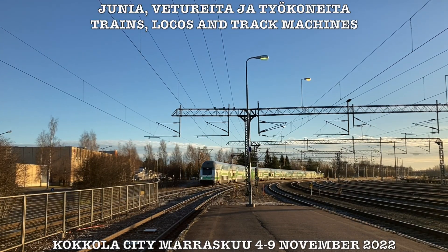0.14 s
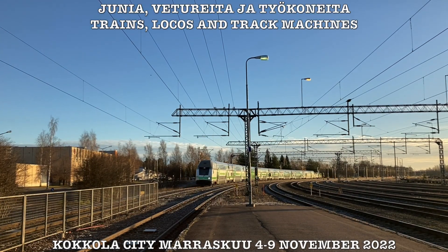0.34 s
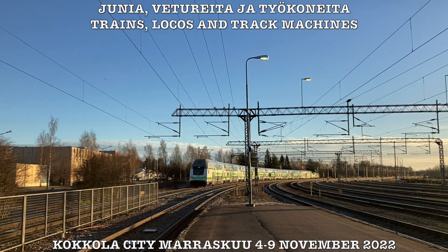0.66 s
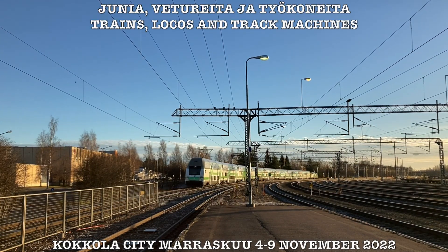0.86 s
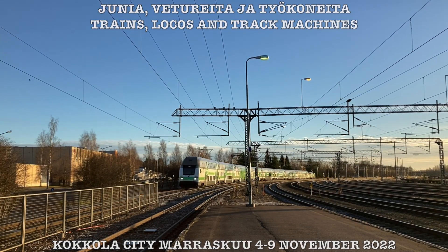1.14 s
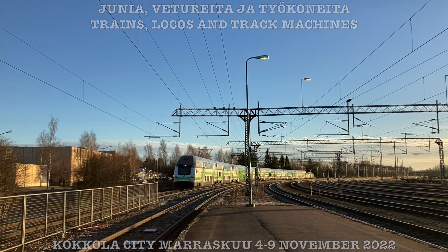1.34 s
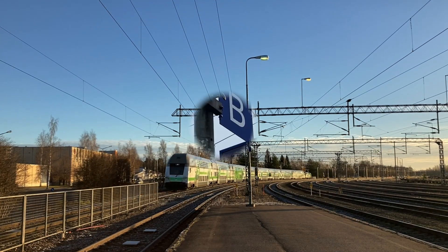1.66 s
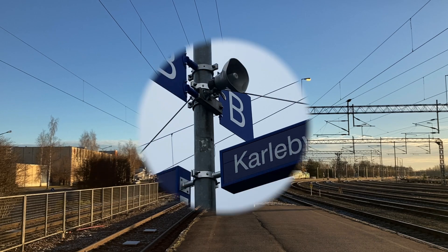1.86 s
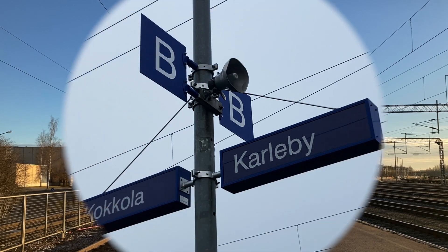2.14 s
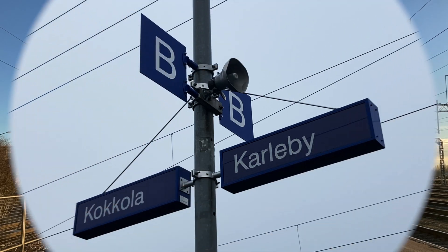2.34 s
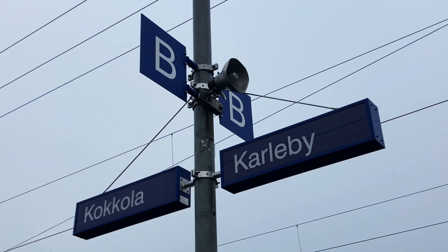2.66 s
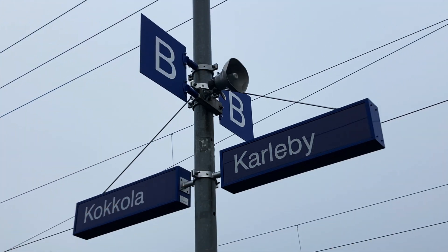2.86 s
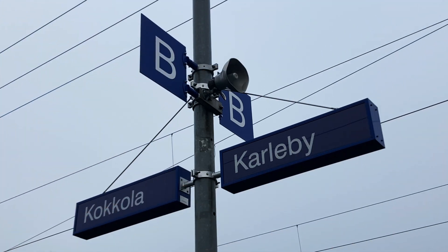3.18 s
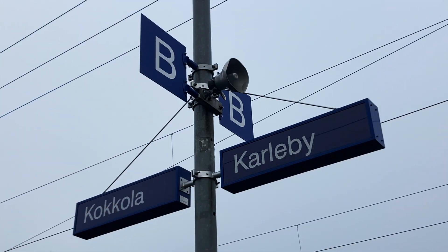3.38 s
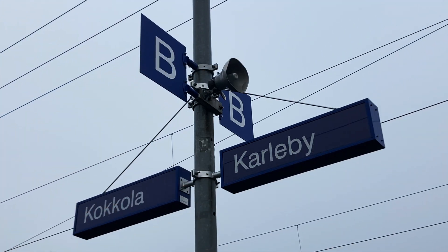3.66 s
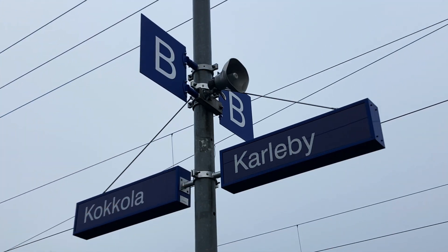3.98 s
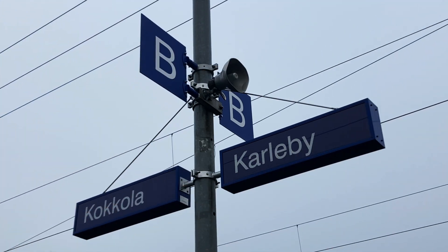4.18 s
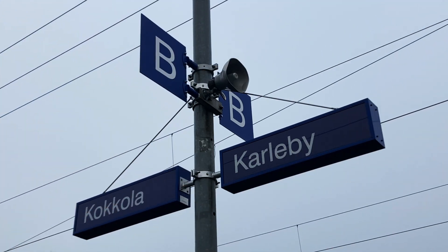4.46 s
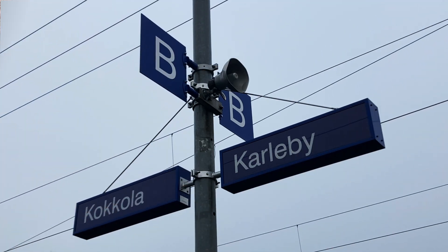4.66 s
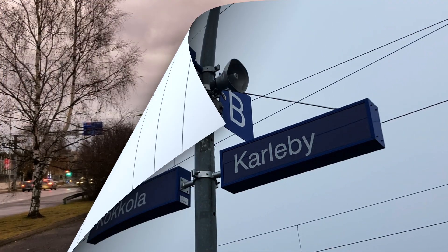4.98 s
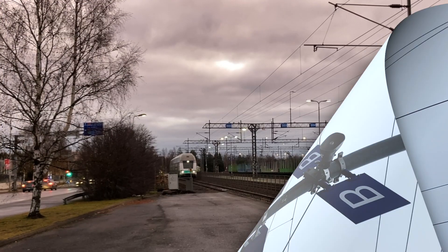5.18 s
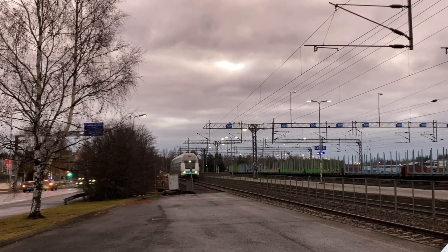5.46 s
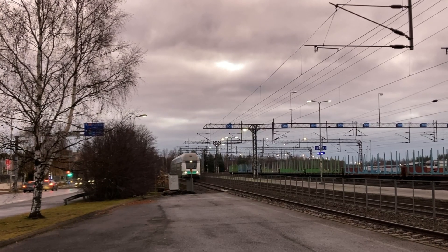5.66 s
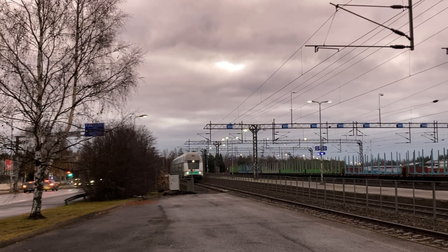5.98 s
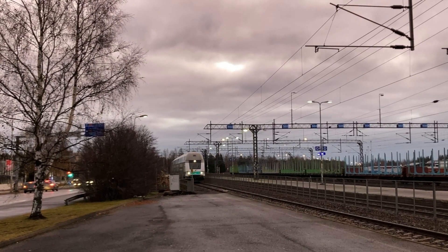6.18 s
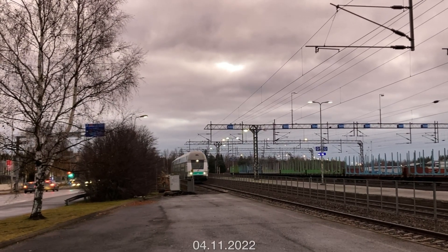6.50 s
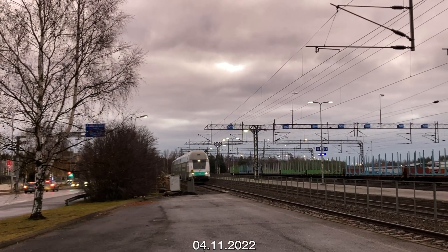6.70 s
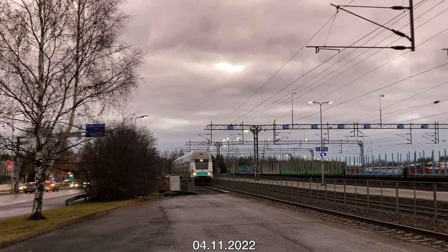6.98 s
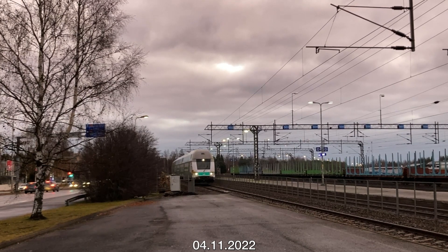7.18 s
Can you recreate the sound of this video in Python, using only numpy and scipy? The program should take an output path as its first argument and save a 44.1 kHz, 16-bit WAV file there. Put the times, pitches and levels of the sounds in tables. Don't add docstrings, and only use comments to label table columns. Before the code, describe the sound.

An open-air rail yard, heard in stereo. From 0 s a low, steady electric transformer hum sits over distant yard rumble and a faint hiss of still air, while wheels roll unevenly on steel. Single joint knocks come at about 0.7 and 1.5 s, then a denser, ringing clatter from 1.8 to 3.7 s, strongest around 2.3 to 2.7 s with a hard clank. Low wind gusts buffet the microphone between about 1.8 and 5 s. From 3.5 s scraping flange hiss and airy rush build, the hum sinks in pitch, and sharp knocks and brief rough squeals crowd 4.4 to 5.1 s as the train is abreast. It fades fast around 5 s. Until 7.3 s, a softer roadside remains: far traffic wash, thin tyre hiss, and a deep diesel throb swelling irregularly, slightly nearer tyres and a quicker pulse at the end.

```python
import sys
import numpy as np
from scipy import signal
from scipy.fft import rfft, irfft
from scipy.io import wavfile
from scipy.ndimage import uniform_filter1d, map_coordinates

SR = 44100
rng = np.random.default_rng(int(sys.argv[2]) if len(sys.argv) > 2 else 0)


def unload_audio(sound):
    columns = np.transpose(np.atleast_2d(sound))
    steps = np.round(np.clip(columns, -1, 1) * 32767)
    wavfile.write(sys.argv[1], SR, steps.astype(np.int16))


def gain_from_decibels(decibels):
    exponent = np.asarray(decibels, float) / 20
    return 10 ** exponent


N = 323694
T = np.arange(N) / SR
HZ = np.maximum(np.arange(N // 2 + 1) * SR / N, .01)
LEFT_RIGHT = np.array([[.5], [-.5]])

SPEED_M_S, PASSES_S, TRACK_M = 21.5, 4.684, 6.2
FADE_FROM_S, FADE_DB_PER_S = 4.956, 33

# t/s, level/dB
HUM_LEVEL = [(0, -34), (.1, -28.5), (.3, -28.5), (1.04, -31), (1.4, -29.5), (2.0, -28.5), (2.72, -25.5),
             (3.34, -26), (3.46, -28), (4.11, -28), (4.33, -38.5), (4.55, -32.5), (4.73, -33), (4.87, -43),
             (4.96, -38), (5.15, -47), (5.25, -42)]
# t/s, f/Hz
HUM_PITCH = [(0, 129.8), (2.8, 129.7), (3.5, 128.8), (4.1, 127.4), (4.5, 125.4), (4.8, 121.8), (5.1, 116.8),
             (5.3, 116.2)]

# f/Hz, width/Hz, level/dB
RAIL_MODES = [(426, 55, -1), (471, 30, -3), (588, 75, -1), (655, 45, -6), (780, 80, -8), (871, 45, -8),
              (940, 80, -2), (1018, 55, -4), (1180, 65, -2), (1350, 100, -1), (1455, 40, -10)]
WHEEL_MODES = [(1830, 150, -4), (1950, 150, -3), (2340, 130, 1), (2620, 150, -5), (2800, 160, -2),
               (3370, 240, -7), (3740, 240, -6), (4300, 300, -8), (4800, 500, -13), (5400, 600, -15),
               (6200, 1200, -20)]
# t/s, length/s, low rail modes level/dB, high rail modes level/dB
BOGIES = [
    (0, 0.52, -51, -44.5),
    (.5, 0.8, -47, -42.5),
    (1.45, 0.65, -48, -43.5),
    (1.95, 0.98, -41, -35.5),
    (2.85, 0.35, -47, -45),
    (3.15, 0.54, -43, -39.5),
    (3.65, 0.56, -47, -45),
    (4.0, 0.49, -49, -41),
    (4.45, 0.4, -61, -46),
]
# t/s, low modes peak/dB, high modes peak/dB
JOINTS = [(0.693, -33, -26), (1.2, -41, -34), (1.548, -35, -25), (1.614, -42, -25.5), (1.743, -43, -39),
          (1.818, -29, -23), (1.97, -30, -25), (2.019, -27, -24.5), (2.146, -35, -28), (2.259, -35, -34),
          (2.343, -21.5, -30), (2.388, -30, -21), (2.435, -37, -26), (2.526, -31, -32), (2.644, -26, -22),
          (2.702, -33, -38), (2.771, -27.5, -24), (2.849, -25.5, -40), (2.964, -29, -20), (3.027, -31, -27),
          (3.101, -32, -35), (3.356, -32, -39), (3.428, -39, -40), (3.507, -29, -37), (3.555, -39, -21),
          (3.687, -30.5, -23.5), (3.978, -33, -35), (4.099, -37, -27), (4.203, -36, -39), (4.772, -50, -26)]
# t/s, peak/dB, f/Hz, decay/ms
BLOWS = [(2.344, -18.5, 550, 3), (2.355, -24, 900, 4), (2.373, -26, 500, 3), (2.436, -25, 620, 3),
         (2.6415, -11.5, 950, 3), (2.645, -21, 600, 5), (4.636, -17, 520, 3.5), (4.643, -17, 930, 7),
         (4.662, -25, 600, 3), (4.7715, -19.5, 450, 4), (4.781, -27, 400, 3), (4.83, -25, 700, 2.5)]
RINGS = [(1.19, -31, 411, 30), (1.8, -34, 780, 25), (1.98, -32.5, 788, 35), (2.01, -29.5, 600, 28),
         (2.0, -32, 450, 45), (2.18, -32.5, 792, 30), (2.34, -26, 593, 18), (2.372, -30, 585, 30),
         (2.343, -24.5, 414.5, 38), (2.35, -25, 955, 20), (2.405, -27, 950, 25), (2.39, -28, 1350, 31),
         (2.48, -29, 583, 25), (2.52, -29.5, 427, 26), (2.52, -33, 790, 18), (2.545, -32, 1330, 25),
         (2.644, -38, 607, 12), (2.665, -29, 946, 22), (2.70, -33, 440, 21), (2.77, -27.5, 596, 23),
         (3.03, -35, 950, 30), (3.255, -28, 949, 46), (3.31, -34, 590, 35), (3.33, -32, 778, 30),
         (3.35, -27.5, 394, 12), (3.465, -31, 943, 30), (3.505, -29.5, 423, 26), (3.52, -33, 592, 21),
         (3.57, -33, 800, 23), (3.66, -34.5, 418, 25), (3.87, -29.5, 937, 33), (4.17, -36, 470, 27),
         (4.32, -35, 398, 25), (4.5, -35, 800, 22)]
ROLL_DB, ROLL_LOUDEST_S, ROLL_SAG_DB = (-51, -42), 3.27, 2.5
SHADED_HZ, SHADED_FROM_S, SHADED_DB_PER_S = 1000, 3.31, 15

# f/Hz, density/dB per Hz
BODY_COLOUR = [(30, -12), (60, 2.5), (200, -5.5), (400, -8), (800, -15.5), (1200, -29), (1700, -14.5),
               (3000, -21.5), (7000, -54)]
FLANGE_DB, BODIES_DB = -38.5, -36.
# t/s, lead/ms
FLANGE_LEAD = [(3.6, 0.18), (4.0, .28), (4.4, 0.47), (4.7, 0.5), (4.95, 0.44), (5.25, 0.36)]
# t/s, length/s, f/Hz, level/dB
SQUEALS = [(3.22, .08, 3270, -65), (4.25, 0.38, 4600, -55), (4.36, .12, 3520, -71), (4.42, .1, 2800, -57),
           (4.5, 0.09, 2620, -43), (4.64, 0.1, 3580, -42), (4.73, 0.11, 4010, -56),
           (4.78, 0.065, 4900, -49), (4.85, 0.11, 5250, -48), (4.86, .08, 4850, -63),
           (4.76, 0.25, 2400, -46), (4.79, 0.21, 1740, -47), (4.45, 0.34, 4120, -49.5),
           (5.0, 0.21, 5150, -61), (5.07, 0.11, 3300, -49), (5.06, 0.15, 3380, -49), (5.5, .35, 2100, -63),
           (3.1, 0.3, 1900, -55), (4.98, 0.23, 5190, -59), (4.55, .2, 4250, -52), (4.3, 0.26, 2250, -54),
           (4.2, 0.33, 2650, -55), (4.84, 0.17, 2150, -47), (4.98, 0.27, 1900, -51),
           (4.92, 0.32, 2520, -53), (4.2, .1, 2600, -53), (5.5, .22, 4020, -58), (4.6, 0.11, 1760, -48),
           (4.6, 0.33, 2600, -50), (3.95, 0.22, 1900, -52)]

# f/Hz, density/dB per Hz, left minus right/dB, left lead/rad, likeness 0-1
YARD = [(44.5, -5, -4.5, 0, 0.7), (91, -4, -3.5, -0.5, 1), (201, -9, -2.5, -0.1, 0.98),
        (355, -14.5, 0, 0.5, 0.96), (548, -21, 2.5, -0.7, 0.16), (860, -19.5, 2, 2.5, 0.13),
        (1080, -16.5, 2, 3, 0.52), (1570, -23, 1, 2, 0.77), (2090, -24.5, 0, -1.5, 0.52),
        (2610, -29, 0, 1.32, 1), (3450, -38.5, -1, 1.26, 1), (4370, -41, -3, 0.5, 0.8),
        (5930, -44.5, -1, 3, 0.7), (7200, -68, -2, -3, 0.3)]
ROAD = [(45, -12, -7, .3, 0.85), (94, -4.5, -3, 0.32, 0.87), (216, -11.5, -2, 0.98, 1),
        (321, -16, -0.5, 1.38, 0.65), (500, -17.5, 0.8, 1.8, 1), (760, -19, 2, 2.75, 0.46),
        (1080, -20, 4, 2.28, 0.63), (1430, -24.5, -1, 1.8, 0.64), (2020, -23, -2, 2.26, 0.46),
        (2710, -29.5, -2.5, 3.36, 0.33), (3590, -35, -1.5, 3.5, 0.25), (4940, -37.5, -0.5, 12.6, 0.24),
        (4900, -38.5, -5, 6.5, 0.66), (6200, -51, -2.5, 9.1, 0.81)]
# t/s, level/dB
YARD_LEVEL = [(0, -35), (1.5, -33.5), (2.499, -33.5), (3.3, -35), (3.8, -35.5), (4.3, -38.5), (4.9, -43),
              (5.4, -77)]
ROAD_LEVEL = [(4.7, -63), (4.9, -38.5), (5.2, -34), (5.6, -33.5), (6.2, -33.5), (6.7, -32.5), (7.1, -31.5),
              (7.34, -31)]
TYRE_LEVEL = [(5.0, -75), (5.6, -62), (6.4, -55), (6.8, -47), (7.1, -45), (7.34, -47)]
TYRE_TILT_DB = 6.

# f/Hz, density/dB per Hz
FLOOR_COLOUR = [(6000, -18), (7000, 1), (7430, 13), (8000, 6), (8800, -25), (10200, -25), (10800, 11),
                (11400, -8), (12500, 1), (13200, -25), (14200, -20), (15000, 3)]
RUSH_COLOUR = [(6500, -1), (8100, 2.5), (9000, -10), (9900, -8), (10800, -2), (12400, -4), (13200, -15),
               (14200, -15), (15300, -8)]
TYRE_HISS_COLOUR = [(6300, -0.5), (8000, -2), (8900, -13), (9900, -2), (11500, -3), (12600, -2.5),
                    (13300, -23), (15700, -33)]
FAR_HISS_COLOUR = [(14300, -5), (15000, 1), (15500, 1), (15800, -11)]
# t/s, level/dB
FLOOR_LEVEL = [(0, -68), (2, -64.5), (4.9, -68), (5.3, -96)]
RUSH_LEVEL = [(0, -87), (.45, -82), (.85, -75), (1.9, -67.5), (2.8, -61.5), (4.7, -52.5), (4.84, -52),
              (4.97, -60), (5.3, -68)]
TYRE_HISS_LEVEL = [(4.75, -59), (5.0, -61), (5.6, -61), (6.0, -63.5), (6.7, -62), (7.34, -61)]
FAR_HISS_LEVEL = [(4.8, -80), (5.2, -73), (5.9, -74), (6.3, -77), (6.6, -86), (7.34, -88)]

# f/Hz, density/dB per Hz
GUST_COLOUR = [(2, -31), (5, 29), (9, 23), (15, 17), (30, -8), (60, -7), (150, -66)]
# t/s, length/s, level/dB
GUSTS = [
    (1.75, 1.0, -34),
    (2.75, 0.36, -42),
    (3.0, 0.61, -30),
    (3.7, 0.41, -30),
    (4.0, 0.3, -32),
    (4.3, .5, -32),
    (4.7, 0.55, -44),
]

# t/s, f/Hz
FIRING = [(5.0, 59.), (5.7, 57.04), (6.5, 57.04), (7.05, 57.55), (7.34, 61.1)]
# t/s, length/s, level/dB
THROBS = [
    [(5.13, 0.34, -32.5), (5.46, 0.36, -26), (5.76, 0.54, -25), (6.14, 0.46, -25), (6.5, 0.52, -29),
     (6.96, .31, -25.5), (7.23, 0.29, -24.5)],
    [(4.85, 0.23, -44), (5.17, 0.18, -34), (5.46, 0.51, -29.5), (6.12, 0.4, -34), (6.68, .32, -37.5),
     (7.02, 0.1584, -30.5), (7.2, 0.31, -34)],
    [(5.2, 0.43, -40.5), (5.68, 0.22, -44), (5.85, 0.53, -37), (6.36, 0.15, -35.5), (6.6, 0.18, -36),
     (6.85, 0.2, -41), (7.05, 0.65, -36)],
    [(5.55, .2, -45.5), (5.8, 0.12, -47), (6.15, .2, -46.5), (6.38, .14, -49), (6.83, .16, -40),
     (7.24, 0.19, -35.5)],
]
# t/s, length/s, level/dB
HALF_THROBS = [
    (5.5, 0.34, -49),
    (5.95, 0.27, -49),
    (6.62, 0.71, -37),
]

# f/Hz, left minus right/dB
PORTS = [(100, 2.5), (330, 8), (520, 0), (800, 7.5), (1200, -3), (1600, -0.5), (2700, 4), (4500, 3.5),
         (6000, -4)]
TOP_HZ = 15600


def curve(table, off=-120.):
    s, *columns = np.transpose(table)
    ends_early = s[-1] < T[-1] - .05
    return [np.interp(T, s, c, off, off if ends_early else c[-1]) for c in columns]


def along(table):
    f, *columns = np.transpose(table)
    return [np.interp(np.log(HZ), np.log(f), c) for c in columns]


def unit(x):
    return x / np.sqrt(np.mean(x ** 2))


def walk(rate):
    hold = int(SR / rate)
    steps = np.repeat(rng.standard_normal(N // 100), hold)[:N]
    return unit(uniform_filter1d(uniform_filter1d(steps, hold), hold))


def noise_pair(likeness):
    c = np.clip(likeness, 0, 1)
    a, b = rfft(rng.standard_normal((2, N)))
    shared, own = np.sqrt(1 + c) * a, np.sqrt(1 - c) * b
    return np.array([shared + own, shared - own])


def ring(spectrum, hz, width):
    return irfft(spectrum / (1 + 1j * (HZ - hz ** 2 / HZ) / width) ** 2, N)


def heard(x, lead_ms):
    tilted = irfft(rfft(x) * gain_from_decibels(LEFT_RIGHT * along(PORTS)[0]), N)
    shift = LEFT_RIGHT * lead_ms * SR / 1000 + np.arange(N)
    return np.array([map_coordinates(c, [s], order=3, mode="nearest") for c, s in zip(tilted, shift)])


def half_sine(start, length):
    return np.sin(np.pi * np.clip((T - start) / length, 0, 1))


def swells(rows, fullness):
    return sum(gain_from_decibels(np.array(db)[:, None]) * np.maximum(half_sine(s, length), 0) ** fullness
               for s, length, *db in rows)


def swell_db(rows, fullness):
    return 20 * np.log10(swells(rows, fullness)[0] + 1e-6)


def passing(db, spread, loss_db_per_m, early_s):
    r = np.hypot(SPEED_M_S * (T + early_s - PASSES_S), TRACK_M)
    far_db = spread * 20 * np.log10(r / TRACK_M) + loss_db_per_m * (r - TRACK_M)
    return db - far_db - FADE_DB_PER_S * np.maximum(T - FADE_FROM_S, 0)


def tone(hz, db, pan_db, lead, wobble):
    phase = 2 * np.pi * np.cumsum(hz) / SR + wobble * walk(19)
    return np.sqrt(2) * gain_from_decibels(db + LEFT_RIGHT * pan_db) * np.sin(phase + LEFT_RIGHT * lead)


def background(table, level, flicker_db, tilt_db):
    db, pan_db, lead, likeness = along(table)
    db = db + tilt_db * np.log2(HZ / 1000)
    db = db - 24 * np.maximum(np.log2(45 / HZ), 0) - 30 * np.maximum(np.log2(HZ / 7000), 0)
    full = noise_pair(likeness) * gain_from_decibels(db + LEFT_RIGHT * pan_db) * np.exp(1j * LEFT_RIGHT * lead)
    bands = 0
    for k in range(8):
        share = np.cos(np.pi / 2 * np.clip(np.log2(HZ / 30) / 1.5 - k, -1, 1)) ** 2
        bands = bands + irfft(full * share, N) * gain_from_decibels(flicker_db * walk(9))
    return unit(bands) * gain_from_decibels(curve(level)[0])


def hiss(colour, db, likeness):
    lag = np.exp(1j * LEFT_RIGHT * (np.pi - 2 * np.pi * HZ * .22 / 1000))
    skirt_db = 50 * np.minimum(np.log2(HZ / colour[0][0]), 0)
    return unit(irfft(noise_pair(likeness) * gain_from_decibels(along(colour)[0] + skirt_db) * lag, N)) * gain_from_decibels(db)


def hum():
    pitch = np.interp(T, *np.transpose(HUM_PITCH))
    return tone(pitch, curve(HUM_LEVEL)[0] + 1.0 * walk(12), pan_db=-2.5, lead=0.37, wobble=0.18)


def rails():
    even = gain_from_decibels(np.array(ROLL_DB)[:, None] - ROLL_SAG_DB * (T - ROLL_LOUDEST_S) ** 2)
    roll = even + swells(BOGIES, fullness=1.23)
    rattle = np.zeros((2, N))
    after = T[:6000]
    shape = np.clip(after / 0.0016, 0, 1) * np.exp(-after / 0.017)
    for s, *peaks_db in JOINTS:
        start = int(s * SR)
        rattle[:, start:start + len(shape)] += gain_from_decibels(np.array(peaks_db)[:, None] - 6.0) * shape
    low = [m for m in RAIL_MODES if m[0] <= 720]
    high = [m for m in RAIL_MODES if m[0] > 720]
    out = 0
    for modes, steady, bursts in zip((low, high), roll, rattle):
        share = np.sqrt(sum(width * gain_from_decibels(db) ** 2 for _, width, db in modes) * np.pi / SR)
        for hz, width, db in modes:
            push = np.hypot(steady * gain_from_decibels(2.0 * walk(18)), bursts)
            push = push * gain_from_decibels(-SHADED_DB_PER_S * (hz > SHADED_HZ) * np.clip(T - SHADED_FROM_S, 0, 1))
            force = irfft(noise_pair(0.94), N) * push
            out = out + gain_from_decibels(db) / share * ring(rfft(force), hz, width)
    return heard(out + blows(), lead_ms=0.4)


def bodies():
    rumble = irfft(noise_pair(0.77) * gain_from_decibels(along(BODY_COLOUR)[0]), N)
    db = passing(BODIES_DB, spread=0.32, loss_db_per_m=0.14, early_s=0.27) + 2.2 * walk(6.1)
    return heard(unit(rumble) * gain_from_decibels(db), lead_ms=0.3)


def flanges():
    modes = sum(gain_from_decibels(db + 1.8 * walk(18)) * ring(noise_pair(.85), hz, width) for hz, width, db in WHEEL_MODES)
    place = np.cumsum(np.interp(T, *np.transpose(HUM_PITCH)) / 131)
    modes = np.array([map_coordinates(c, [place], order=3) for c in unit(modes)])
    scrape = unit(ring(noise_pair(.75), hz=2800., width=2400.))
    rub_db = passing(FLANGE_DB, spread=0.98, loss_db_per_m=-0.08, early_s=-.03)
    tonal_db = -1.1 + 2.5 * (T - PASSES_S)
    rub = (gain_from_decibels(tonal_db) * modes + 0.48 * scrape) * gain_from_decibels(rub_db)
    s, lead_ms = np.transpose(FLANGE_LEAD)
    return heard(rub + squeals(), np.interp(T, s, lead_ms))


def yard():
    return background(YARD, YARD_LEVEL, flicker_db=1.08, tilt_db=0)


def still_air():
    return hiss(FLOOR_COLOUR, curve(FLOOR_LEVEL)[0] + .6 * walk(11), likeness=0.55)


def rush():
    return hiss(RUSH_COLOUR, curve(RUSH_LEVEL)[0] + 0.96 * walk(17), likeness=1.0)


def blows():
    out, after = np.zeros(N), T[:7000]
    for s, db, hz, decay_ms in BLOWS + RINGS:
        rise_ms = max(decay_ms / 4, 1000 / hz)
        rise = np.sin(np.pi / 2 * np.clip(after * 1000 / rise_ms, 0, 1)) ** 2
        fade = np.exp(-after * 1000 / decay_ms) * rise
        start = int(s * SR)
        out[start:start + len(after)] += gain_from_decibels(db) * fade * np.sin(2 * np.pi * hz * after)
    return out


def wind():
    swings = unit(irfft(noise_pair(0.7) * gain_from_decibels(along(GUST_COLOUR)[0]), N))
    return swings * swells(GUSTS, fullness=0.72)


def squeals():
    out = np.zeros(N)
    for s, length, hz, db in SQUEALS:
        since = T - s
        phase = 2 * np.pi * hz * since * (1 - .04 * since) + 1.5 * walk(140)
        out += gain_from_decibels(db + 4.5 * walk(45)) * half_sine(s, length) * np.sin(phase)
    return out


def traffic():
    far = background(ROAD, ROAD_LEVEL, flicker_db=-0.22, tilt_db=0)
    return far + background(ROAD, TYRE_LEVEL, flicker_db=1.5, tilt_db=TYRE_TILT_DB)


def tyre_hiss():
    near = hiss(TYRE_HISS_COLOUR, curve(TYRE_HISS_LEVEL)[0] + 0.8 * walk(12), likeness=1.0)
    return near + hiss(FAR_HISS_COLOUR, curve(FAR_HISS_LEVEL)[0] + 1.5 * walk(12), likeness=0.87)


def diesel():
    hz = np.interp(T, *np.transpose(FIRING))
    out = tone(1.55 * hz, swell_db(HALF_THROBS, fullness=0.55), pan_db=1.0, lead=0.4, wobble=0.32)
    for k, rows in enumerate(THROBS):
        db = swell_db(rows, fullness=0.85) + 1.0 * walk(19.0)
        out = out + tone((k + 1) * hz, db, pan_db=-4.0 + 0.97 * k, lead=0.26 + 0.5 * k, wobble=0.23 + 0.039 * k)
    return out


def scene():
    train = hum() + rails() + bodies() + flanges() + rush()
    first = train + yard() + wind()
    second = traffic() + tyre_hiss() + diesel()
    return first + second + still_air()


def top_cut(x):
    return signal.sosfilt(signal.butter(12, 17100, fs=SR, output="sos"), x)


def record(dry):
    low_pass = signal.ellip(10, .2, 70, TOP_HZ, fs=SR, output="sos")
    mix = signal.sosfilt(low_pass, dry)
    return top_cut(mix)


dry = scene()
out = record(dry)
unload_audio(out)
```